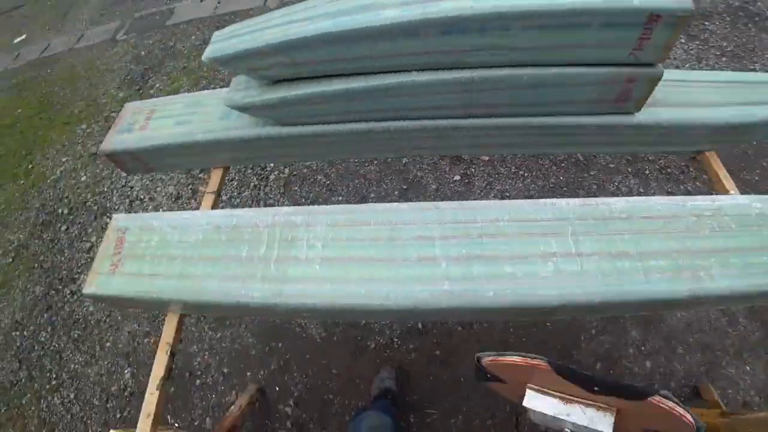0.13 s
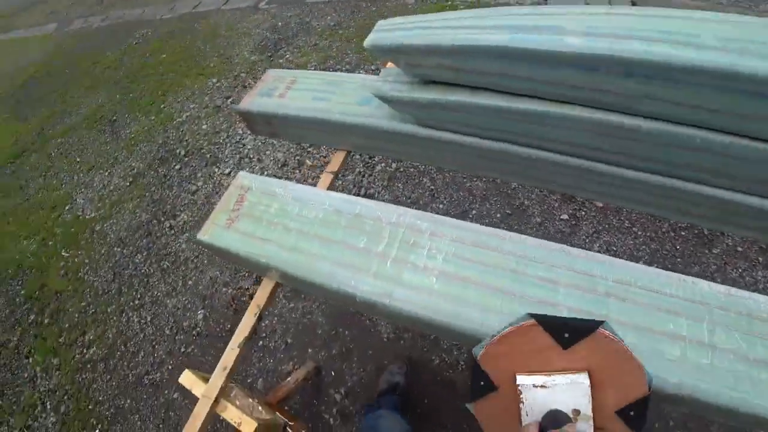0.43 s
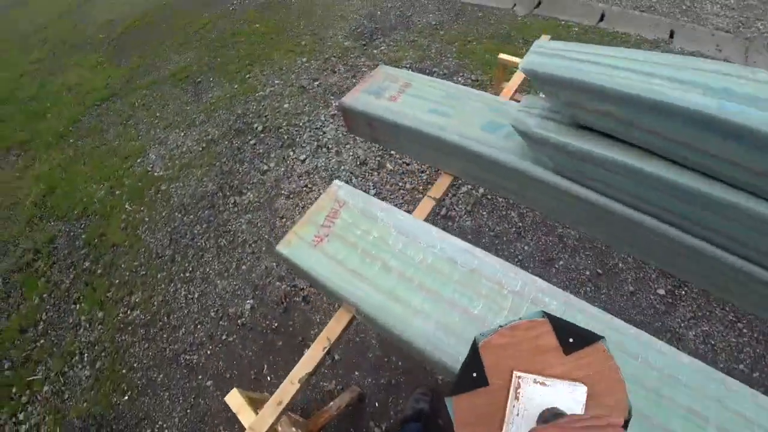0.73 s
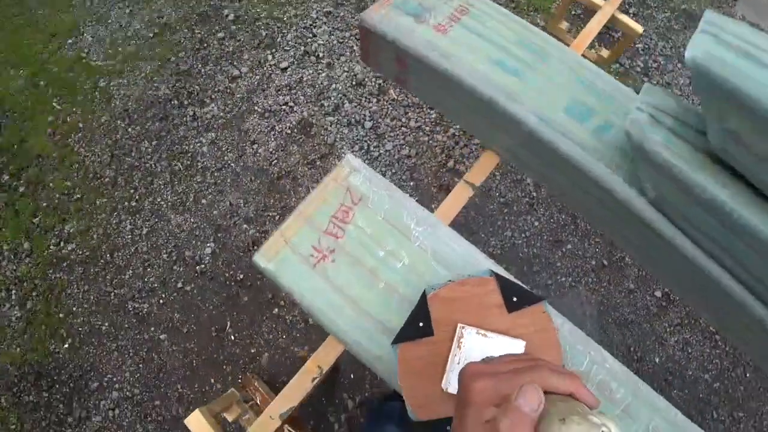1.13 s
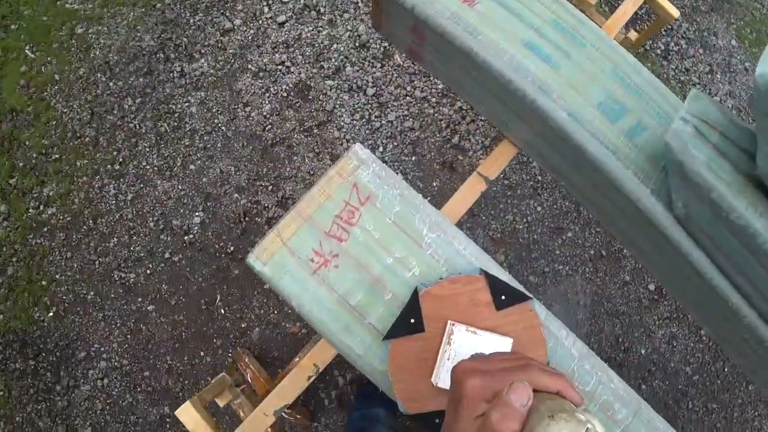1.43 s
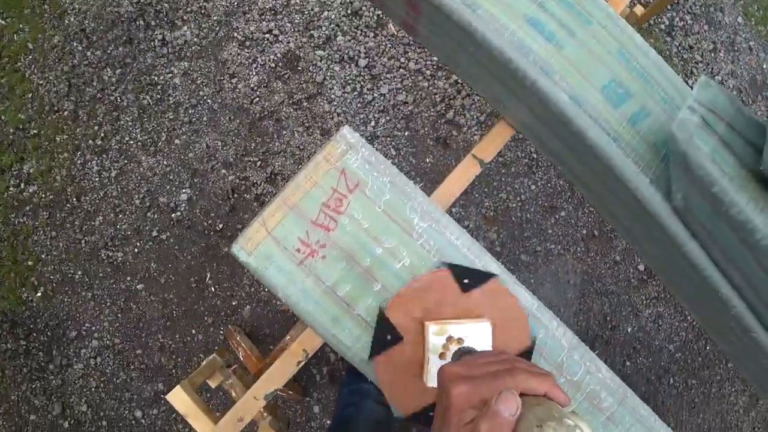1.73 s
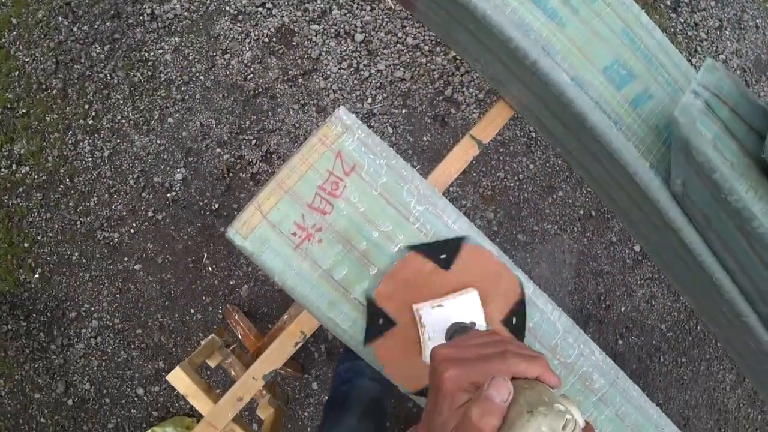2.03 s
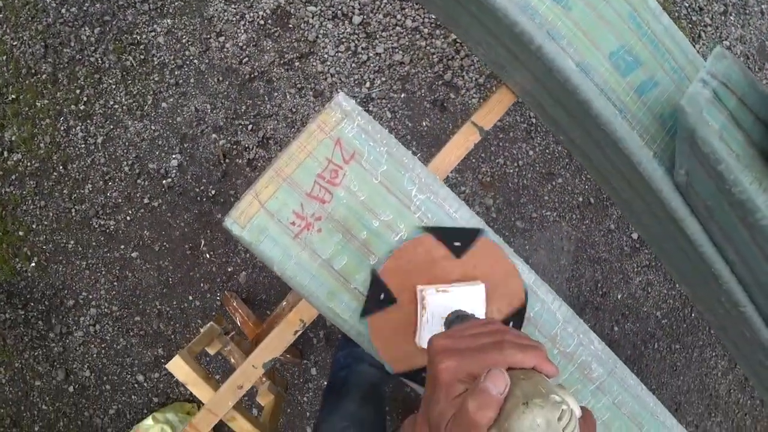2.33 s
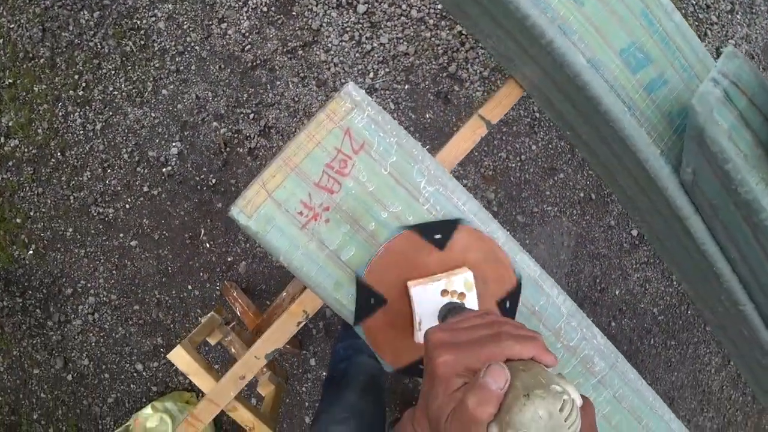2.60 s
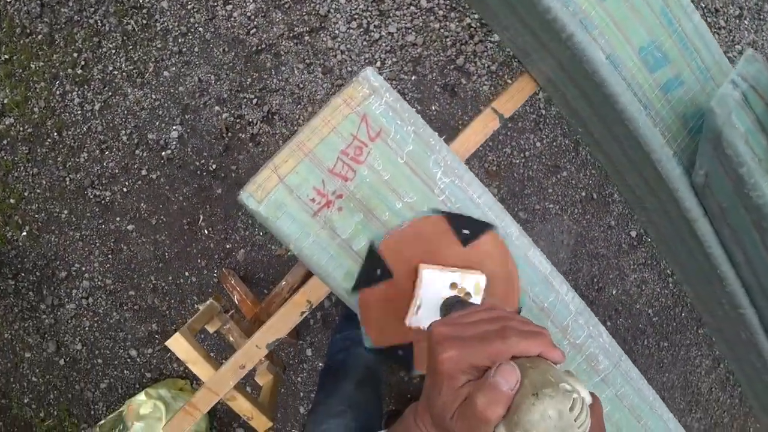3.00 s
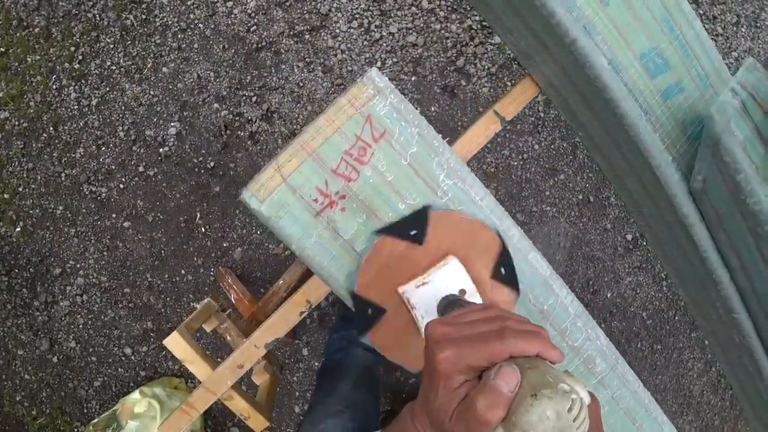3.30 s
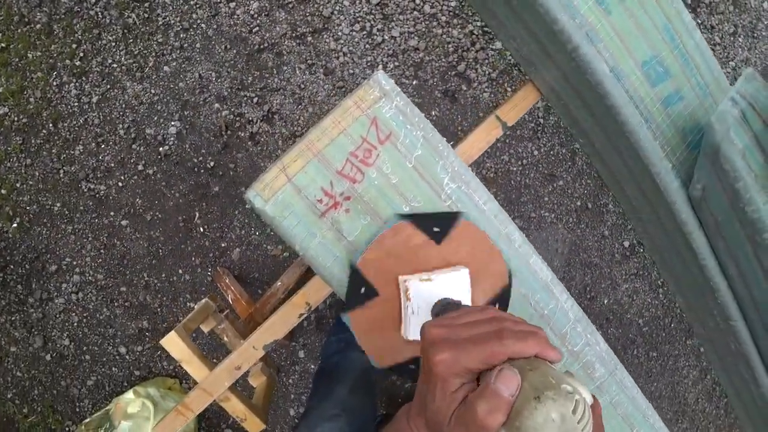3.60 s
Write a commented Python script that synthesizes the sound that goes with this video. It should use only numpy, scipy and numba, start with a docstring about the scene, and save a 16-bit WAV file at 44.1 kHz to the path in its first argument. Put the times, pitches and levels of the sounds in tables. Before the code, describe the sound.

A drill-driven sanding disc starts abruptly and grinds a hard board outdoors, finally chattering and squealing

```python
"""A drill with a sanding disc works on a board: random grit grains rasp, and narrow noise rings the disc.
A wavering tone whines for the gears and the board's modes thud; late on, the skipping disc squeals.
Before that, someone outdoors shifts about on gravel, swings the tool, sets it down and clicks the trigger.
Gravel is short rings and scuffs of noise; distant traffic and breeze are soft coloured noise.
Two microphone ports hear it all with uneven level and phase."""
import sys
import numpy as np
from scipy import signal
from scipy.fft import rfft, irfft
from scipy.io import wavfile
from scipy.ndimage import uniform_filter1d
from numba import njit

SR = 44100
rng = np.random.default_rng(int(sys.argv[2]) if len(sys.argv) > 2 else 0)


def materialize(psi):
    """Save the field psi as 16-bit PCM at rate SR to the path in sys.argv[1].

    A 1-D psi becomes a single channel; in a 2-D psi each row is a channel.
    """
    bounded = np.clip(np.atleast_2d(psi).T, -1, 1)
    quanta = np.round(bounded * 32767).astype(np.int16)
    wavfile.write(sys.argv[1], SR, quanta)


def gain_from_db(level_db):
    """Convert decibel levels to linear amplitude factors (20 dB per decade)."""
    decades = np.asarray(level_db, float) / 20
    return 10 ** decades


N = 165375
T = np.arange(N) / SR
HZ = np.fft.rfftfreq(N, 1 / SR) + 1  # the 1 keeps logarithms finite

# Levels in the tables are relative: the functions add their own trims.
# distant traffic and breeze: pitch_hz, level_db per Hz
AIR_COLOUR = [(15, -78), (25, -49), (193, -10.5), (219, -7), (472, -6), (509, -10.5), (747, -4), (1010, -7),
              (1340, -10.5), (3120, -20), (4240, -30), (11200, -34.5), (14600, -78), (22000, -120)]
# low bump of a footfall: time_s, level_db
FOOTFALL = [(0.85, -74), (0.978, -57), (1.096, -64), (1.11, -87), (1.15, -78)]
# scuffs of shoes in gravel: middle_s, length_s, level_db
SCUFFS = [(0.06, .12, -71), (0.178, 0.11, -57.5), (0.417, 0.11, -53.5), (0.533, 0.066, -62.5),
          (0.76, 0.36, -59), (.85, .12, -82), (.96, 0.053, -71), (1.215, 0.058, -53), (1.47, .05, -63)]
# colour of the scuffs: pitch_hz, level_db per Hz
SCUFF_COLOUR = [(880, -39), (1500, 4), (2060, -4), (2480, 4.5), (2990, 0.5), (6820, -1.5), (11200, -22.5),
                (14600, -54), (22000, -120)]
# crunches of single stones: start_s, level_db, ring_hz, hiss_db relative to the ring
CRUNCHES = [(0.0336, -47, 3140, -7), (0.165, -43, 2370, -12), (0.194, -37, 2170, -2),
            (0.2967, -41.5, 1730, -5), (0.4369, -40, 2640, -8), (0.4499, -31.5, 2370, -13),
            (0.4626, -40, 2010, -8), (0.5598, -41, 1460, -7), (0.6926, -49.5, 2700, 3.5),
            (0.7098, -42, 2570, -6), (0.7214, -36.5, 1950, -10), (0.7422, -36, 2640, -9),
            (0.7504, -30, 2030, -22), (0.7584, -33, 2110, -18), (0.7664, -35.5, 2620, -7.5),
            (0.833, -29, 2150, -20), (0.8444, -35, 1980, -22), (0.8545, -34, 1930, -15),
            (0.8871, -39, 2450, -1.5), (0.9093, -37, 1870, -21), (0.96, -47, 1540, -3),
            (0.9817, -46, 1880, -14), (1.0969, -47.5, 2200, -2), (1.1893, -41, 5040, -1),
            (1.257, -40.5, 2230, -3)]
# hollow whoosh as the tool swings by: time_s, centre_hz, level_db
WHOOSH = [(0.0, 1060, -67), (0.014, 1090, -47), (0.068, 1050, -46), (0.09, 1000, -47.5),
          (0.112, 1030, -46.5), (0.166, 1070, -58), (0.2, 1010, -65)]
# its upper bands: pitch_hz, width_hz, level_db
WHOOSH_OVERTONES = [(3030, 110, -15.5), (4570, 90, -22)]
# rings as the disc is set on the board: pitch_hz, level_db, t60_s (time to fall 60 dB, capped later)
KNOCK = [(338, -12, 0.026), (474, -5, 0.082), (764, -10, 0.21), (1860, -18, 0.096), (2480, -2, 0.023),
         (3150, -21, 0.084), (4274, -38, 0.13)]
# trigger clicks: start_s, level_db, t60_s of the tail
TRIGGER = [(1.4747, -34, 0.062), (1.492, -40, 0.05), (1.5346, -25.5, 0.054), (1.5874, -17, 0.074),
           (1.6184, -11, 0.11)]
# colour of the clicks: pitch_hz, level_db per Hz
TRIGGER_COLOUR = [(290, -57), (500, -4.5), (934, -10), (1260, -15), (2200, 1.5), (2480, -8), (3210, -4.5),
                  (6000, -10), (11200, -23), (14600, -56), (22000, -120)]
# ringing modes of the board: pitch_hz, width_hz (before widening), level_db
BOARD_MODES = [(334, 31, -4.5), (383, 76, -1), (475, 19, -6.5), (555, 45, 0.5), (687, 47, -5),
               (772.4, 99, 2.5), (999, 30, -7), (1230, 77, -10.5)]
# limits between the board's low, middle and high modes: pitch_hz
MODE_GROUP_HZ = [430, 660]
# high spots of the disc thud on the board: peak_s, low_db, middle_db, high_db
THUDS = [(1.685, -21.5, -29.5, -32), (1.777, -48, -40, -36), (1.814, -65, -43, -37.0),
         (1.86, -60.5, -52, -44), (1.909, -53, -33.5, -29), (1.944, -70, -60, -62), (2.026, -37, -34, -40),
         (2.083, -58, -48, -38), (2.126, -39, -43, -34), (2.188, -50.4, -41, -37), (2.224, -64, -49, -33),
         (2.297, -59, -39, -34.5), (2.378, -44, -32, -34.9), (2.423, -46.9, -49, -40),
         (2.469, -63, -40.7, -34.7), (2.534, -40, -36, -31), (2.61, -61, -42, -33),
         (2.672, -50.3, -38.5, -55), (2.717, -52, -41, -45), (2.809, -49, -40.9, -38),
         (2.935, -35.5, -35.5, -34.5), (3.001, -49, -36.5, -38.5), (3.113, -52, -41, -42),
         (3.19, -46, -38, -58), (3.309, -48, -38, -37.5), (3.401, -62, -42, -38), (3.449, -49.4, -63, -43),
         (3.502, -49, -52, -41), (3.552, -70, -70, -41)]
# gear mesh tone: time_s, pitch_hz, level_db
WHINE = [(1.92, 1572, -49.5), (2.04, 1693, -42), (2.075, 1769, -29), (2.17, 1825, -29.5),
         (2.27, 1853, -31.5), (2.4, 1868, -36), (2.5, 1850, -30.5), (2.6, 1810, -31), (2.68, 1834, -31.5),
         (2.76, 1815, -35), (2.87, 1836, -32.5), (3.0, 1850, -38), (3.15, 1878, -30.5), (3.3, 1850, -35),
         (3.5, 1780, -33), (3.6, 1820, -32), (3.75, 1804, -39)]
# rough ring of the gear housing: time_s, level_db
HOUSING = [(1.64, -25), (1.69, -26.5), (1.74, -25.5), (1.86, -21.5), (1.95, -24), (2.02, -31), (2.6, -31),
           (3.2, -28), (3.75, -24)]
# pressure of disc on board: time_s, rasp_db, board_db relative to the rasp
CONTACT = [(1.62, -30.5, -1), (1.66, -24, -7.5), (3.27, -25, -21.5), (3.75, -27.5, -19)]
# level as the drill spins up: time_s, level_db
SPIN_UP = [(1.617, -36), (1.632, -3), (1.652, 2), (1.68, 0.5)]
# colour of the grit's rasp: pitch_hz, level_db per Hz
RASP_COLOUR = [(35, -71), (60, -41), (272, -53.5), (338, -29), (535, -12), (711, -25), (811, -13),
               (1260, -11.5), (1820, -2), (2120, -2.5), (3510, -4), (7230, -3.5), (10500, -10), (11200, -9),
               (14600, -36), (22000, -120)]
# ringing of the disc: pitch_hz, width_hz, level_db
SCRAPES = [(2300, 240, -17.5), (2800, 134, -17), (2980, 67, -23.5), (4150, 530, -16), (5420, 100, -18),
           (6150, 150, -14.5), (6940, 130, -22.5)]
# the disc skips off the board: landing_s, depth_db, lifting_s
SKIPS = [(2.315, 1.5, 0.04), (2.618, 7, 0.01), (2.841, 6.5, 0.04), (3.335, 12, 0.027), (3.441, 13, .035),
         (3.546, 12.5, 0.058), (3.651, 16.5, 0.031), (3.76, 19, 0.037)]
# squeals of the skipping disc: start_s, length_s, level_db, pitch_hz at the middle
SQUEALS = [(2.981, 0.049, -34, 2870), (3.255, 0.048, -28, 2800), (3.27, 0.025, -42, 2470),
           (3.348, 0.028, -26.5, 2850), (3.363, 0.038, -26.5, 2640), (3.384, 0.022, -24.5, 2793),
           (3.39, 0.0295, -32.5, 1160), (3.289, .03, -35, 2740), (3.302, .025, -33, 2300),
           (3.445, .025, -32, 3010), (3.499, .03, -35, 2330), (3.558, 0.018, -30, 2950),
           (3.598, 0.032, -33, 2300), (3.452, 0.0267, -26, 2796), (3.486, 0.029, -25.5, 2640),
           (3.505, 0.016, -36, 1156), (3.555, 0.027, -25.5, 2800), (3.585, 0.032, -27.5, 2730),
           (3.664, 0.026, -27.5, 2830)]
# level of the left port: pitch_hz, left_minus_right_db
LEFT_DB = [(60, 10), (110, 4), (190, 1), (350, -10), (620, -15.5), (1120, -7.0), (2010, -5.5), (3610, -5.5),
           (6470, -5.0), (11600, -4.5)]
# phase lead of the left port: pitch_hz, lead_radians
LEFT_LEAD = [(0, 4), (430, 0.05), (690, 2), (1210, 3), (7150, 1.44), (10800, 0.52), (11300, 1.3),
             (11800, -7.5)]
# power share of common sound at the left port: pitch_hz, share
ALIKE = [(60, .2), (200, 1), (700, 0.92), (1700, 0.68), (4000, 0.96), (7500, 1), (9000, 0.25),
         (11000, 0.41)]


def unit(x):
    """Scales the average power to 1."""
    return x / np.sqrt(np.mean(x ** 2))


def curve(rows, col=1, off=None):
    """Joins a table's points over time; off is the value outside them."""
    a = np.array(rows, float)
    return np.interp(T, a[:, 0], a[:, col], off, off)


def over_hz(rows):
    """Joins a table's points over pitch, on a log scale."""
    a = np.array(rows, float)
    return np.interp(np.log(HZ), np.log(a[:, 0] + 1), a[:, 1])


def noise(count=N):
    """Two unrelated noises: the sound common to both ports and the scattered rest."""
    return rng.standard_normal((2, count))


def colour(x, rows):
    """Gives sound the spectrum in a table, at power 1."""
    return unit(irfft(rfft(x) * gain_from_db(over_hz(rows)), N))


@njit
def svf(x, hz, width):
    """Resonant band-pass filter with a moving centre."""
    y = np.empty_like(x)
    for c in range(len(x)):
        b, l = 0., 0.  # band and low states
        for i in range(x.shape[1]):
            g, k = np.tan(np.pi * hz[i] / SR), width / hz[i]
            v = (b + g * (x[c, i] - l)) / (1 + g * (g + k))
            b, l, y[c, i] = 2 * v - b, l + 2 * g * v, k * v
    return y


def band(x, hz, width):
    """One resonance, at power 1."""
    return unit(svf(x, hz + np.zeros(x.shape[1]), 1. * width))


def steep(x, hz, width):
    """Two resonances in a row, for steeper sides."""
    return band(band(x, hz, width), hz, width)


def walk(rate):
    """Slow random wander with spread near 1; rate in new values per second."""
    k = int(SR / rate)
    steps = np.repeat(rng.standard_normal(N // k + 1), k)
    return 1.66 * uniform_filter1d(uniform_filter1d(steps, k), k)[:N]


def tone(hz):
    """A sine that goes only into the sound common to both ports."""
    phase = 2 * np.pi * (np.cumsum(hz) / SR + rng.random())
    return np.sin(phase) * np.array([[np.sqrt(2)], [0]])


def add(out, at, x):
    """Mixes x in from a moment on."""
    i = max(int(at * SR), 0)
    out[..., i:i + x.shape[-1]] += x[..., :N - i]


def swell(at, rise, fall):
    """A short rise to 1 at a moment, then a fall."""
    out, t = np.zeros(N), T[:8192] - .06
    add(out, at - .06, np.exp(np.where(t < 0, t / rise, -t / fall)))
    return out


def decay(at, t60):
    """A sudden start, then a fall of 60 dB in t60 seconds."""
    return (T >= at) * gain_from_db(-60 * np.abs(T - at) / t60)


def air():
    """Distant traffic and breeze as coloured noise, with one soft footfall."""
    bump = steep(noise(), 140.0, 170.0) * gain_from_db(curve(FOOTFALL, off=-120))
    return colour(noise(), AIR_COLOUR) * gain_from_db(-51.5 + 0.27 * walk(4.4)) + bump


def gravel():
    """Single stones tick and ring briefly amid soft scuffs of uneven noise."""
    t60_s, width_hz, pitched = .022, 1300, .9
    scuff = sum(gain_from_db(db) * np.exp(-(2 * (T - s) / length) ** 2) for s, length, db in SCUFFS)
    grit_db = np.minimum(3 * rng.exponential(size=N), 20)
    out = colour(noise() * gain_from_db(grit_db), SCUFF_COLOUR) * scuff * gain_from_db(2 * walk(150))
    hiss, t = steep(noise(), 4900.0, 10000.0), T[:2048]
    for s, db, hz, hiss_db in CRUNCHES:
        ring = pitched * tone(hz + 0 * t) + steep(noise(count=2048), hz, width_hz)
        ring = ring * (1 - np.exp(-t / 0.001)) * gain_from_db(-60 * t / t60_s)
        tick = gain_from_db(hiss_db + 4.5) * hiss[:, int(s * SR):][:, :2048] * gain_from_db(-60 * t / 0.01)
        add(out, s, gain_from_db(db - 4.5) * (ring + tick))
    return out


def whoosh():
    """The swinging tool: hollow bands of noise that swell and fade."""
    hollow = band(noise(), curve(WHOOSH), 90.)
    hollow = hollow + sum(gain_from_db(db) * band(noise(), hz, w) for hz, w, db in WHOOSH_OVERTONES)
    return hollow * gain_from_db(curve(WHOOSH, 2, off=-120))


def knock():
    """The disc set on the board: a tick of noise and fading sines."""
    start_s = 1.396
    out = gain_from_db(-30.5) * decay(start_s, 0.038) * steep(noise(), 1070.0, 2000.0)
    for hz, db, t60 in KNOCK:
        ring = np.sin(2 * np.pi * hz * (T - start_s))
        out = out + gain_from_db(db - 34.5) * decay(start_s, min(t60, .07)) * ring
    return out


def trigger():
    """Plastic clicks: each a sharp burst of noise and a weaker, longer tail."""
    clicks = 0
    for s, db, t60 in TRIGGER:
        clicks = clicks + gain_from_db(db - 7.5) * (decay(s, 0.0074) + 0.29 * decay(s, t60))
    return clicks * colour(noise(), TRIGGER_COLOUR)


def board():
    """The board's modes hum under the disc and flare at each thud."""
    rows = np.array(THUDS)
    shapes = np.array([swell(at, 0.0087, 0.0074) for at in rows[:, 0]])  # rise and fall in s
    out = 0
    for hz, width, mode_db in BOARD_MODES:
        group = 1 + np.searchsorted(MODE_GROUP_HZ, hz)
        struck = gain_from_db(rows[:, group] - 1.5) @ shapes
        hum = gain_from_db(curve(CONTACT) + curve(CONTACT, 2) + 2.9 * walk(25.04))
        # widened because the filter pair narrows the band
        mode = steep(noise(), hz, width * 2.19)
        out = out + gain_from_db(mode_db) * (gain_from_db(-11.5) * hum + struck) * mode
    return out


def gears(lift):
    """The mesh tone wavers inside the rough ring of the housing; both dip a little at skips."""
    turn_hz, turn_peak_s, turn_db = 10.1, 2.08, 2.2
    wobble, flicker_db, skip_share = .005, 2.2, .25
    turn = turn_db * np.cos(2 * np.pi * turn_hz * (T - turn_peak_s))
    mesh_db = curve(WHINE, 2, off=-120) - 3 + flicker_db * walk(50) + turn
    mesh = tone(curve(WHINE) * (1 + wobble * walk(60))) * gain_from_db(mesh_db)
    ring = band(noise(), 1850 * (1 + 0.024 * walk(24)), 117)  # centre and width in Hz
    ring = ring * gain_from_db(curve(HOUSING) - 6 + 2 * walk(29.9) + turn / 2)
    return (mesh + ring) * gain_from_db(-skip_share * lift)


def scrapes():
    """The disc rings in wandering bands of noise; those from 2 to 3.3 kHz grow with time."""
    growth_db_per_s = 2.5
    out = 0
    for hz, width, db in SCRAPES:
        growth = (2000 < hz < 3300) * growth_db_per_s * (T - 2.5)
        level = gain_from_db(db + 2.8 * walk(21.73) + growth)
        out = out + level * band(noise(), hz * (1 + 0.043 * walk(12)), width)
    return out


def grit():
    """Random grains rasp over steady noise, and each pitch range wanders in level."""
    grains_per_s, spread_db, patchy_db = 9000, 2, 0.94
    size = gain_from_db(spread_db * np.clip(rng.standard_normal(N), -2, 2))
    hits = rng.random(N) < grains_per_s / SR
    grains = colour(noise() * (.5 + hits * size), RASP_COLOUR)
    out = 0
    for hz in 100 * 2 ** np.arange(0, 7, .5):  # overlapping bands half an octave apart
        octaves = np.log2(np.clip(HZ, 100, 9051) / hz)
        share = np.cos(np.pi * np.clip(octaves, -.5, .5)) ** 2
        out = out + irfft(rfft(grains) * share, N) * gain_from_db(patchy_db * walk(28.174))
    return out


def squeals(out):
    """Adds the skipping disc's squeals: falling noise bands, a clean tone and an octave above."""
    width_hz, sag_hz_per_s, clean_db, octave_db = 57, 1500, -3.5, -13
    for s, length, db, hz in SQUEALS:
        n = int(length * SR)
        # the first 0.05 s (2205 samples) lets the filters settle and is cut off
        pitch = hz - sag_hz_per_s * (T[:8192] - length / 2 - .05)
        rub = band(noise(count=8192), pitch, width_hz)
        clean = tone(pitch * (1 + 0.0063 * walk(162)[:8192]))
        octave = band(noise(count=8192), 2 * pitch, 2 * width_hz)
        squeal = rub + gain_from_db(clean_db) * clean + gain_from_db(octave_db) * octave
        add(out, s, gain_from_db(db) * squeal[:, 2205:2205 + n] * signal.windows.tukey(n, .6))


def sanding():
    """Skips cut the contact and each landing bursts; board and gears sound along with the rasp."""
    landing_s, burst_db, burst_s = 0.0057, 1.5, 0.0054
    lift, burst = 0, 0
    for s, db, up in SKIPS:
        height = np.where(T < s, 1 + (T - s) / up, 1 - (T - s) / landing_s)
        lift = lift + db * np.clip(height, 0, 1) ** 1.7
        burst = burst + db / 10 * burst_db * swell(s + landing_s, landing_s, burst_s)
    rasp_db = 2.5 + curve(CONTACT) - lift + burst + .5 * walk(20)
    rasp = (grit() + scrapes()) * gain_from_db(rasp_db)
    running = gain_from_db(curve(SPIN_UP)) * (T > SPIN_UP[0][0])
    out = (rasp + board() + gears(lift)) * running
    squeals(out)
    return out


def scene():
    """Near sounds lose their lows below 300 Hz; the air keeps its own."""
    near = gravel() + whoosh() + knock() + trigger() + sanding()
    low_cut = signal.butter(4, 300, "high", fs=SR, output="sos")
    return air() + signal.sosfilt(low_cut, near)


def low_pass(x):
    """Removes everything above the highest recorded frequency."""
    return signal.sosfilt(signal.butter(12, 12220, fs=SR, output="sos"), x)


def record(dry):
    """The left port differs in level and phase and hears scattered sound; peaks are rounded, treble cut."""
    soft_clip, top_hz = .9, 11020
    common, scattered = rfft(dry)
    left = gain_from_db(over_hz(LEFT_DB)) * np.exp(1j * over_hz(LEFT_LEAD))
    alike = np.clip(over_hz(ALIKE), 0, 1)
    # makes the average of the two ports keep the scene's colour
    pair = 2 / np.sqrt(1 + abs(left) ** 2 + 2 * np.sqrt(alike) * left.real)
    left_sound = left * (np.sqrt(alike) * common + np.sqrt(1 - alike) * scattered)
    ports = irfft(pair * np.array([left_sound, common]), N)
    rounded = np.tanh(soft_clip * ports) / soft_clip
    treble_cut = signal.ellip(12, .3, 80, top_hz, fs=SR, output="sos")
    mix = signal.sosfilt(treble_cut, rounded)
    return low_pass(mix)


dry = scene()
out = record(dry)
materialize(out)
```